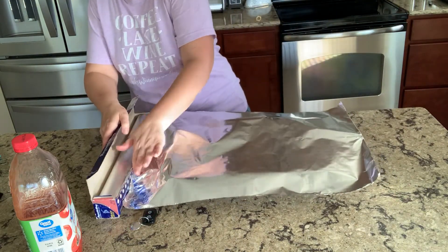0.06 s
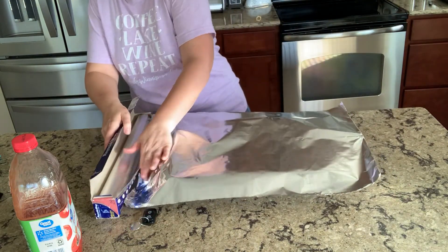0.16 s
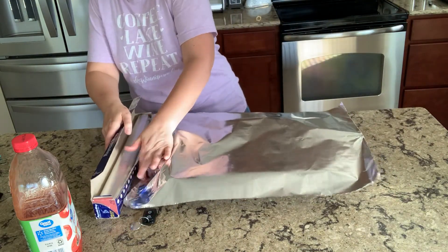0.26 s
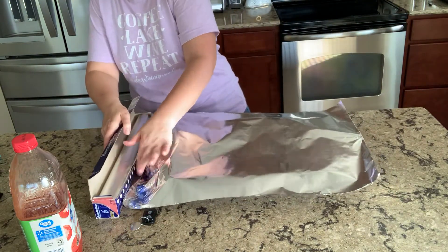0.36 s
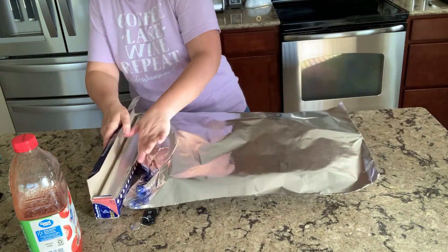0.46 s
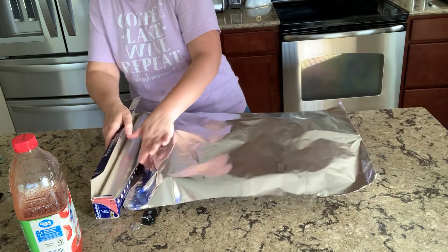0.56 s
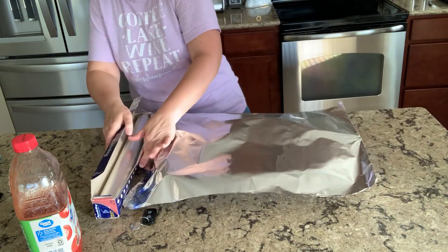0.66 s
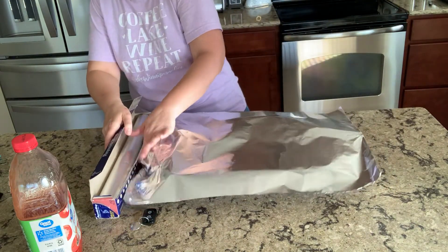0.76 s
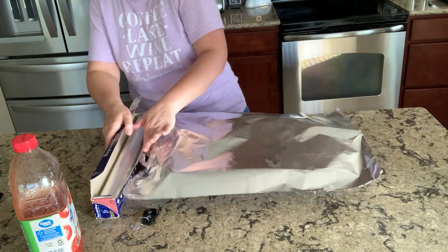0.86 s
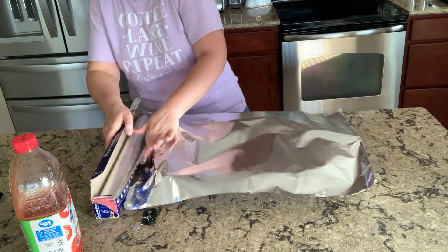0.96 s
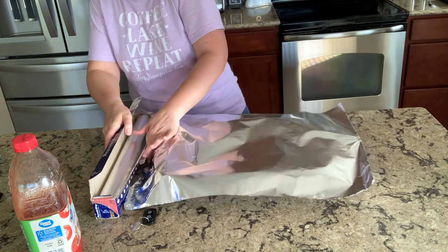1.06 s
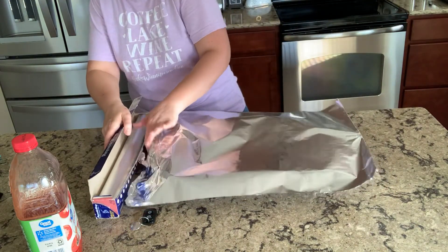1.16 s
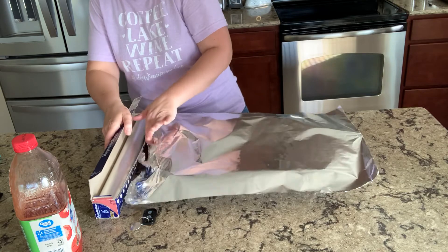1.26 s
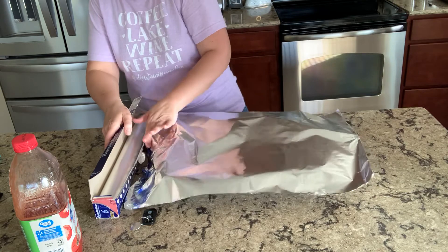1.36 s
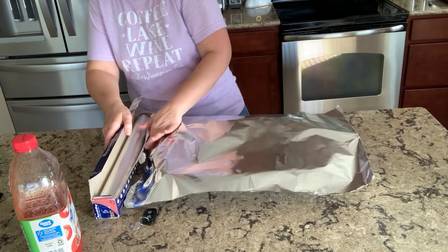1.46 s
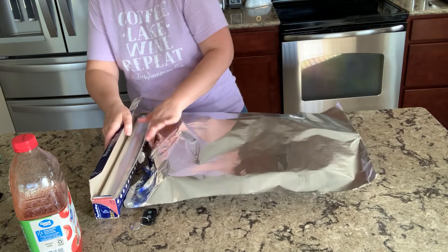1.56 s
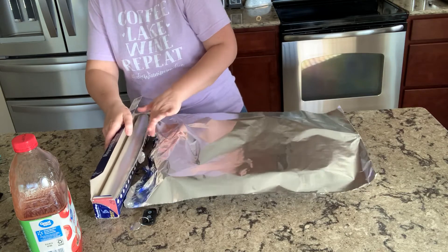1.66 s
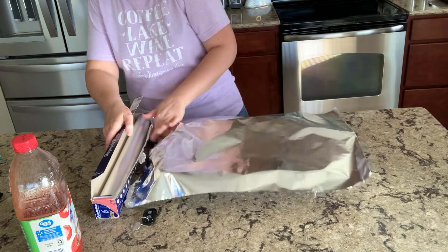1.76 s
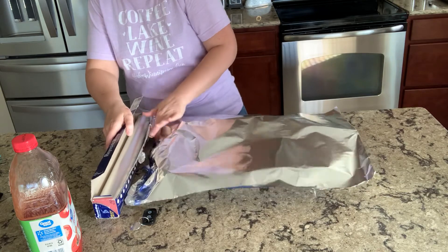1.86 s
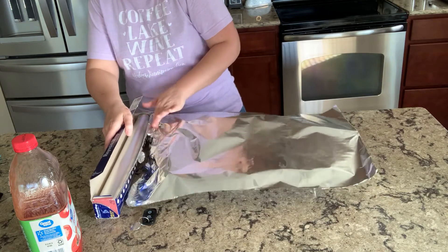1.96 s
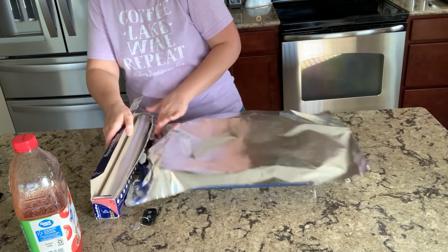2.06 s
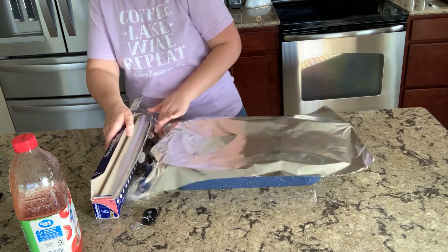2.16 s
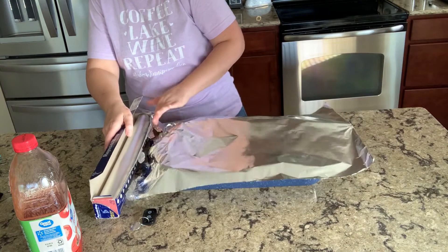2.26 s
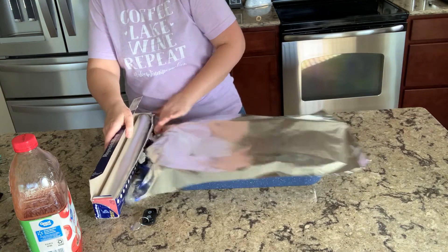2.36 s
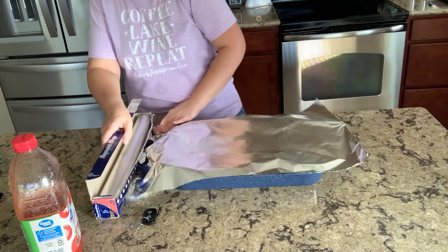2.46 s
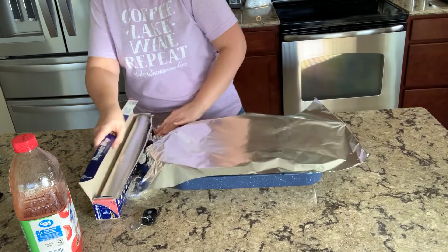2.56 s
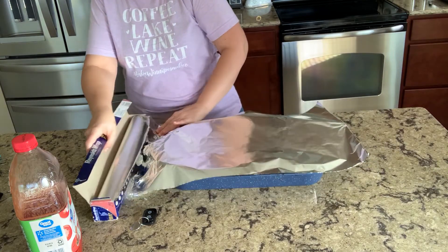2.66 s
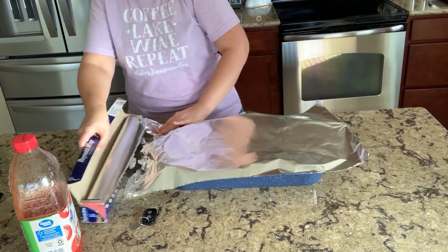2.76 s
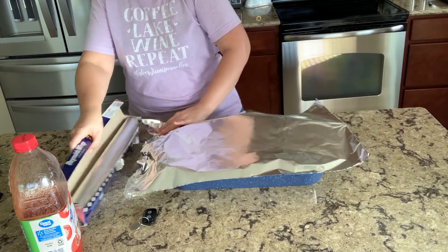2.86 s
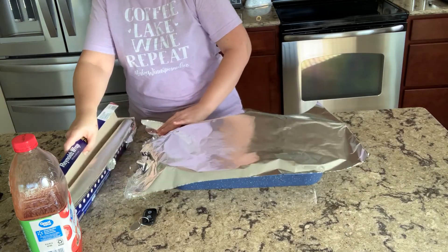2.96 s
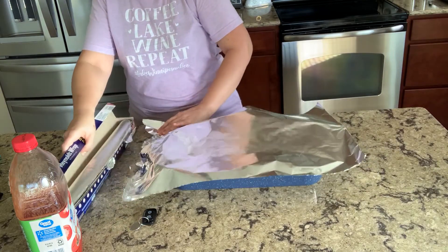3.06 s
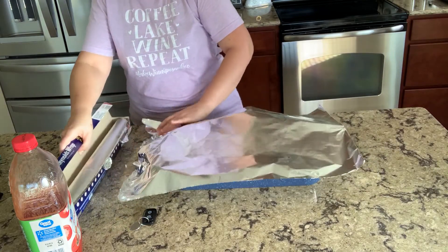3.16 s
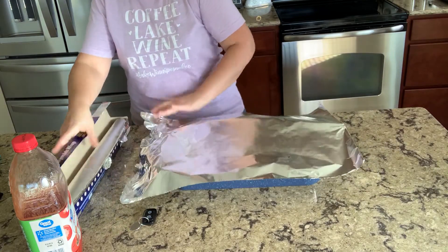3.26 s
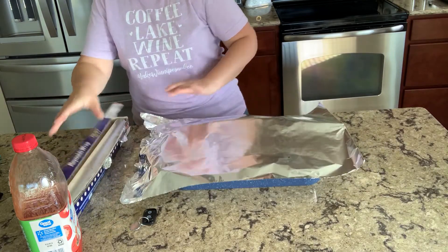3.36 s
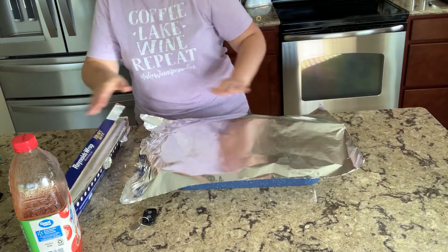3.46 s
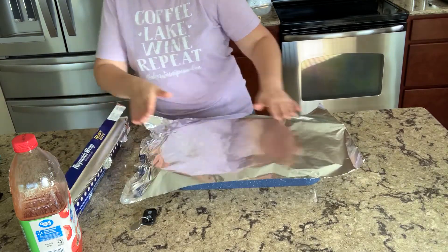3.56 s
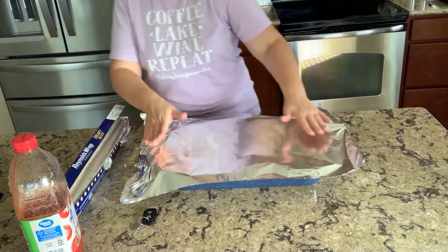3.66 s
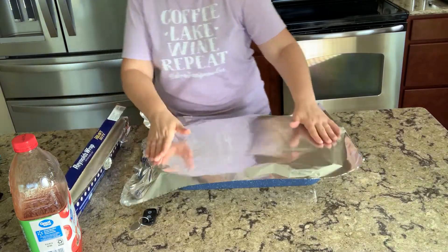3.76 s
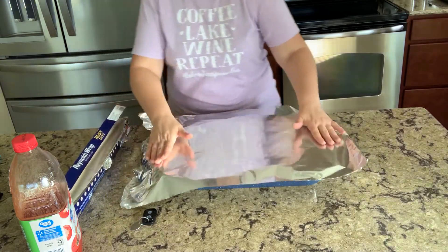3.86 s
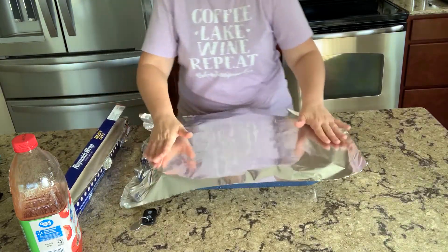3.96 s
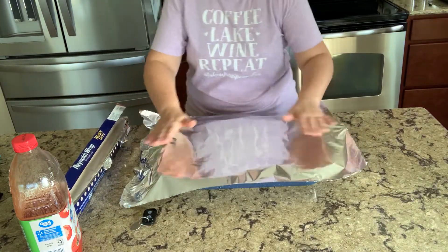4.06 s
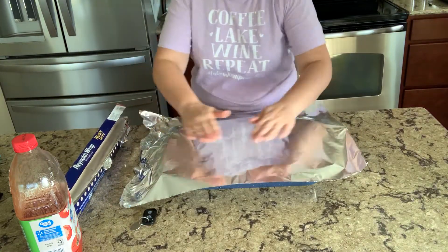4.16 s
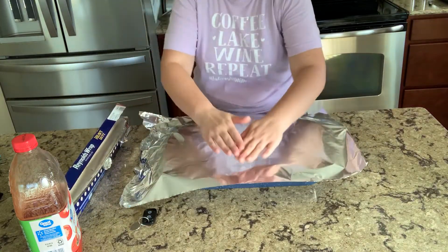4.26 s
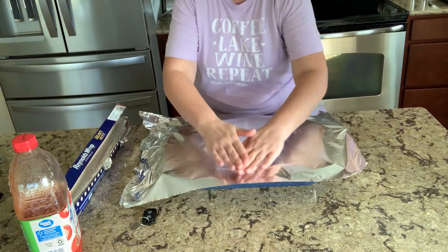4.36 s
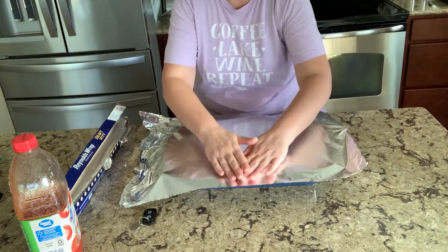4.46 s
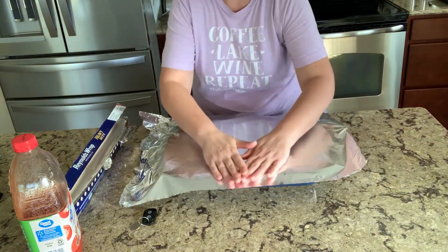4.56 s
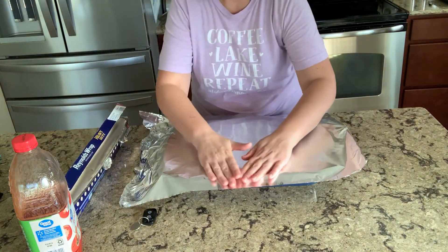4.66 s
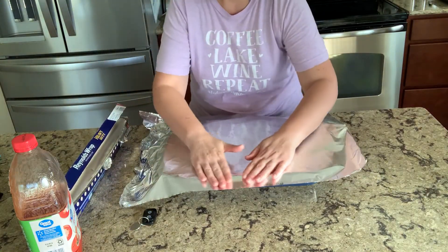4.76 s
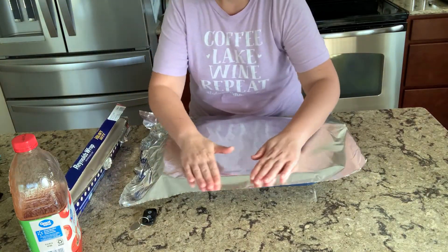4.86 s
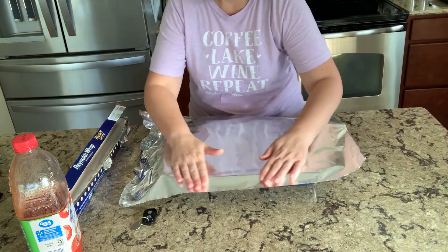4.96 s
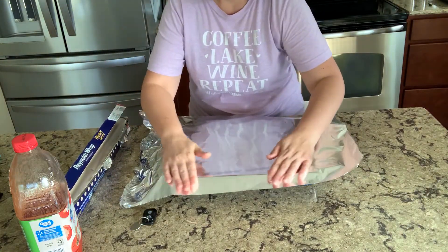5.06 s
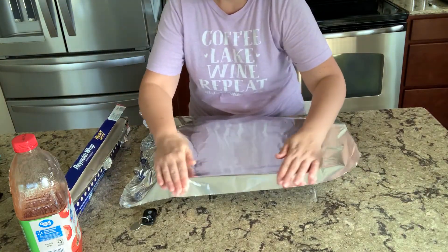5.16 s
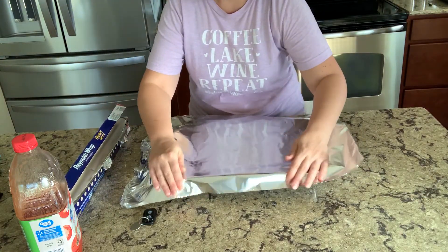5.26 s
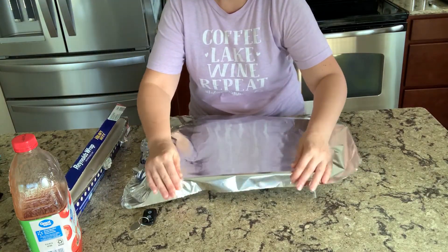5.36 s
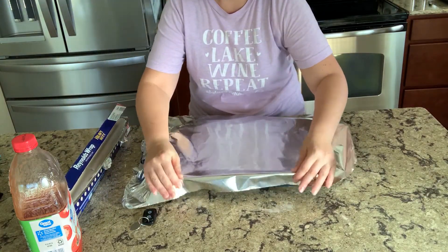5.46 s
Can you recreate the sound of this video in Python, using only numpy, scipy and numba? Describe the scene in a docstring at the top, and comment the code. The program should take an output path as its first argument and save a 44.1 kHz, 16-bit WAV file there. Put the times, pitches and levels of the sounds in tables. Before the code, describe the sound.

Aluminium foil rustles and crackles in repeated surges as a sheet is torn along its box, with sharp snaps from bigger creases. The cardboard box knocks lightly on a stone counter. After a brief lull, hands press the foil over a baking dish with softer crinkles and faint hollow taps. A phone picks it up in a hard, echoing kitchen over a low fridge hum.

```python
"""Aluminium foil rustles and crackles as a hand taps it and tears a sheet off along its box.
Then both hands press the sheet over a baking dish. Tiny creases snap by the thousand, big ones crack
one at a time, and flat patches of foil pop and ring. The card box knocks on the stone counter and
fingertips tap the covered dish. A hard kitchen echoes, a fridge hums, and a phone hears it all
through its two microphone openings (ports)."""
import sys
import numpy as np
from scipy import signal
from scipy.fft import rfft, irfft, next_fast_len
from scipy.io import wavfile
from scipy.ndimage import uniform_filter1d
from numba import njit

SR = 44100
rng = np.random.default_rng(int(sys.argv[2]) if len(sys.argv) > 2 else 0)


def master(y):
    """Save y as 16-bit WAV."""
    cut = np.clip(np.atleast_2d(y).T, -1, 1)
    pcm = np.round(cut * 32767)  # scale
    wavfile.write(sys.argv[1], SR, pcm.astype(np.int16))


N = 243873
T = np.arange(N) / SR
FFT_SIZE = next_fast_len(N + 8192, True)
LOG_HZ = np.log(np.maximum(np.fft.rfftfreq(FFT_SIZE, 1 / SR), 1))

# big creases giving way: (time [s], level [dB], pitch [Hz], bright edge against the body [dB])
BIG_CREASES = [(0.0759, -22, 3800, -6), (0.1446, -13, 2020, -11), (0.183, -14, 3860, -7),
               (0.2449, 3.5, 4230, -6.5), (0.552, -13, 2950, -6.5), (0.612, -12.5, 3460, -2),
               (0.6313, -4, 4500, -4), (1.166, -9, 2920, -12), (1.798, -4.5, 2340, -3.5),
               (2.132, 2, 3540, -5), (2.4203, -6, 2310, 4), (2.791, -9.5, 2860, -3), (2.883, -8.5, 2690, 2),
               (2.958, -10.5, 4990, -5.5), (3.2062, -22, 2660, 4), (3.8134, -15, 3730, 2),
               (3.822, -17, 4540, -2.5), (4.0282, -10, 4570, -4), (4.145, -16, 3590, -3.5),
               (4.516, -30, 6390, 4), (4.5345, -17, 4990, 4), (4.681, -17, 1500, -14),
               (4.8105, -16, 6050, 4), (4.877, -14, 3210, 1.5), (5.0154, -22, 3500, 0),
               (5.102, -17, 3550, -3.5), (5.1484, -24, 3790, -2), (5.22, -13.5, 3220, 1.5),
               (5.23, -10.5, 6200, -15), (5.241, -16, 6840, -17), (5.269, -22, 2430, -10),
               (5.3072, -10, 2670, -2.5), (5.3607, -17, 3560, 1), (5.452, -7, 6470, -4)]


def undb(db):
    """Turn decibels into a gain."""
    return 10 ** (np.asarray(db) / 20)


def unit(x):
    """Scale a signal to an average power of 1."""
    return x / np.sqrt(np.mean(x ** 2))


def sound(spectrum):
    """Turn a spectrum back into a wave."""
    return irfft(spectrum, FFT_SIZE)[..., :N]


def over_hz(table, log_hz=LOG_HZ):
    """Read a table of (frequency [Hz], value) between its rows."""
    hz, value = np.transpose(table)
    return np.interp(log_hz, np.log(hz), value)


def tone_filter(table):
    """A filter with the table's levels that never rings ahead of a click."""
    log_hz = np.log(np.fft.rfftfreq(8192, 1 / SR) + 1)
    cepstrum = irfft(np.log(undb(over_hz(table, log_hz))))
    cepstrum[1:4096] *= 2  # fold the late half onto the early half
    cepstrum[4097:] = 0
    return rfft(irfft(np.exp(rfft(cepstrum))), FFT_SIZE)


def wander(per_s):
    """A value that glides to a new random level per_s times a second."""
    step = int(SR / per_s)
    held = np.repeat(rng.standard_normal(N // step + 1), step)
    return unit(uniform_filter1d(held, step)[:N])


def ping(t, hz, ring_s):
    """A tone that fades by 60 dB in ring_s seconds."""
    return np.sin(2 * np.pi * hz * t) * 1000 ** (-t / ring_s)


def ports(spectrum):
    """One wave reaches the two ports out of step, more so at high pitch."""
    # how far the left port is ahead: (frequency [Hz], phase [rad])
    left_lead = [(100, 0), (600, -.4), (1400, -.2), (3400, -.9), (4500, -.5), (5500, -1.), (6000, 0),
                 (6550, 1.5), (7600, 2.5), (8900, 3.14), (10200, 3.8), (12200, 5.2), (13300, 6.2),
                 (15600, 6.5)]
    return spectrum * np.exp(np.outer([.5j, -.5j], over_hz(left_lead)))


def wide(make):
    """Left and right spectra of a spread-out source: partly shared, partly each port's own."""
    # sound common to both ports: (frequency [Hz], share before the cap [0 to 1])
    common = [(60, 0.62), (300, 0.69), (700, 0.27), (1400, .45), (3500, 0.2), (6000, 0.13), (8000, 0.96),
              (15000, 1)]
    alike = np.clip(over_hz(common), 0, .86)
    shared, *own = rfft(np.array([make() for _ in range(3)]), FFT_SIZE)
    return ports(shared * np.sqrt(alike)) + np.array(own) * np.sqrt(1 - alike)


def wide_layer(make, tone):
    """A spread-out source, filtered to the given tone, at power 1."""
    return unit(sound(wide(make) * tone_filter(tone)))


def fridge():
    """Wavering motor tones over a low room rumble with a faint, even high hiss."""
    # motor tones: (pitch [Hz], level [dB])
    motor = [(53.8, -53.5), (118.4, -50), (183.0, -54.5)]
    # low rumble and faint hiss: (frequency [Hz], relative level [dB])
    noise_tone = [(18, -29.5), (30, -12.5), (71, -1.5), (119, -7), (190, 0), (240, -10.5), (374, -7),
                  (629, -25), (1870, -26), (2370, -53), (5440, -30), (7240, -55), (15000, -57)]
    hum = sum(undb(db + 2.5 * wander(14)) * np.sin(2 * np.pi * hz * T + .92 * wander(14))
              for hz, db in motor)
    return hum + undb(-44) * wide_layer(lambda: rng.standard_normal(N), noise_tone)


def kitchen(x):
    """The echo of a source that never stays put: the power of each octave lingers as noise."""
    # length of the echo: (frequency [Hz], time to fade 60 dB [s])
    echo_times = [(250, 0.98), (1000, 0.48), (4000, 0.72), (8000, 0.23), (15000, 0.069)]
    source, out = rfft(x, FFT_SIZE), 0
    noise = wide(lambda: rng.standard_normal(N))
    for hz in 700 * 2. ** np.arange(5):
        octave = np.cos(np.pi / 2 * np.clip((LOG_HZ - np.log(hz)) / np.log(2), -1, 1))
        keep = 1e-6 ** (1 / (over_hz(echo_times, np.log(hz)) * SR))
        power = signal.lfilter([1 - keep], [1, -keep], sound(source * octave) ** 2)
        loudness = np.sqrt(uniform_filter1d(power, size=301, origin=150) + 1e-18)
        out = out + loudness * unit(sound(noise * octave))
    return out


def tick(at_s=3.6433):
    """One small metallic tick in the pause, gone almost at once."""
    # tones of the tick: (pitch [Hz], level [dB])
    tones = [(1600, -33), (3500, -23), (4400, -29), (5400, -24), (10500, -38), (13500, -37)]
    t = np.maximum(T - at_s, 0)
    return sum(undb(db) * ping(t, hz, ring_s=.007) for hz, db in tones)


def taps():
    """A soft fingertip sets the air under the foil ringing for a moment."""
    # taps on the covered dish: (time [s], level [dB], pitch [Hz])
    touches = [(3.825, -24, 1160), (4.538, -21.5, 1230), (4.679, -22, 976), (5.22, -21, 1400)]
    out, t = np.zeros(N), T[:5000]
    rise = 1 - np.exp(-t / .003)
    for s, db, hz in touches:
        i = int(s * SR)
        out[i:i + len(t)] += undb(db) * ping(t, hz, ring_s=.083) * rise
    return out


def box():
    """The card box raps on the counter; a soft thud of box and roll swells behind."""
    # the box's own tones: (pitch [Hz], relative level [dB], time to fade 60 dB [s])
    tones = [(625, -10, .04), (1495, 0.5, 0.026), (2540, -14, 0.018), (3730, -18, 0.016)]
    # the box is set down: (time [s], rap gain [dB], thud gain [dB])
    knocks = [(2.7924, -26, -50), (2.8842, -13, -42), (2.9592, -13, -17.5)]
    out, t = np.zeros(N), T[:9000]
    rap = sum(undb(db) * ping(t, hz, ring_s) for hz, db, ring_s in tones)
    thud = ping(t, hz=276, ring_s=.14) * (1 - np.exp(-t / .0066))
    for s, rap_db, thud_db in knocks:
        i = int(s * SR)
        out[i:i + len(t)] += undb(rap_db) * rap + undb(thud_db) * thud
    return out


@njit
def ring(out, start, length, pole, size):
    """Add one fading tone per pop; its pole turns and shrinks it a little every sample."""
    for k in range(len(start)):
        z = size[k] + 0j
        for i in range(start[k], min(start[k] + length[k], len(out))):
            z *= pole[k]
            out[i] += z.imag
    return out


def patches(per_s, lo_hz, hi_hz, cycles, spread_db):
    """Flat patches of foil pop and ring briefly, each at its own pitch."""
    when, pitch, size = rng.random((int(per_s * N / SR), 3)).T
    hz = lo_hz + (hi_hz - lo_hz) * pitch
    pole = np.exp(hz / SR * (2j * np.pi - 1 / cycles))
    gain = undb(-spread_db * np.log(size + 1e-9)) * np.sqrt(hz / hi_hz)  # equal energy at every pitch
    start, length = (when * N).astype(np.int64), (4 * cycles * SR / hz).astype(np.int64)
    return ring(np.zeros(N), start, length, pole, gain)


def clicks(per_s, spread_db, bunch_db, bunch_per_s, tail_s):
    """Foil buckles at random, in louder and softer bunches; each click rattles on briefly."""
    hit, size = rng.random(N) < per_s / SR, rng.exponential(size=N)
    train = hit * undb(spread_db * size + bunch_db * wander(bunch_per_s))
    rattle = signal.lfilter([1], [1, -np.exp(-1 / (tail_s * SR))], train ** 2)
    return np.sqrt(rattle) * rng.standard_normal(N)


def sheet(rustle_db, hollow_db, wobble_db):
    """The loose sheet flexes all over, duller as it settles; larger panels pop lower and less often."""
    # rustle of small patches: (frequency [Hz], relative level [dB])
    rustle_tone = [(900, -27.5), (1800, -6.5), (2400, -2.5), (3100, -3), (3800, -1), (4600, -3.5),
                   (6000, -5.5), (8000, -5.5), (11000, -30), (15000, -44.5)]
    # hollow sound of larger panels: (frequency [Hz], relative level [dB])
    hollow_tone = [(450, -27), (900, -2.5), (1250, -1.5), (1600, -2.5), (2300, -8.5), (4000, -36)]
    # low wobble of the sheet: (frequency [Hz], relative level [dB])
    wobble_tone = [(120, -21.5), (270, -2.5), (420, -7.5), (650, 0), (900, -3), (1800, -44)]
    rustle = wide_layer(lambda: patches(4000, 1202, 13000, cycles=41, spread_db=1.7), rustle_tone)
    hollow = wide_layer(lambda: patches(900, 500.5, 3475, cycles=13.8, spread_db=1.2), hollow_tone)
    wobble = wide_layer(lambda: clicks(590, 2.5, 2, bunch_per_s=15, tail_s=.006), wobble_tone)
    dull = signal.sosfilt(signal.butter(2, 4500, fs=SR, output="sos"), rustle)
    bright_share = undb(.63 * np.minimum(rustle_db + 27, 0))
    rustle = bright_share * rustle + (1 - bright_share) * dull
    return undb(rustle_db) * rustle + undb(hollow_db) * hollow + undb(wobble_db) * wobble


def crackle(db):
    """Tiny creases under the fingers: dense bright ticks, and flurries that start sharply and fade."""
    # tone of tiny creases: (frequency [Hz], relative level [dB])
    tone = [(800, -25.5), (2000, -12), (4000, -5.5), (6500, -9), (9000, 8), (11000, 4.5), (13000, -7),
            (15600, -26)]
    ticks = unit(clicks(2500, spread_db=2.2, bunch_db=1.5, bunch_per_s=40, tail_s=.0012))
    flurries = unit(clicks(45, spread_db=2.2, bunch_db=.96, bunch_per_s=7.7, tail_s=.0071))
    spectrum = rfft(ticks + undb(-2.5) * flurries, FFT_SIZE)
    return undb(db) * unit(sound(spectrum * tone_filter(tone)))


def snaps(length=2000, fade_s=.022, rise_s=.0021):
    """Each big crease gives way in a burst of noise: a body around its pitch and a thin bright edge."""
    out, t = np.zeros((2, N + length)), T[:length]
    fade = 1000 ** (-t / fade_s) * (1 - np.exp(-t / rise_s))
    for s, db, hz, edge_db in BIG_CREASES:
        noise = rng.standard_normal(length)
        band = signal.butter(2, [hz / 2.3, hz * 2], "bandpass", fs=SR, output="sos")
        body = unit(signal.sosfilt(band, noise))
        edge = undb(edge_db) * unit(np.diff(noise, n=2, prepend=[0, 0]))
        i = int(s * SR)
        out[:, i:i + length] += undb(db) * np.array([body, edge]) * fade
    return out[:, :N]


def hands():
    """Levels in dB of four layers (rustle, crackle, hollow, wobble): sway, strokes and snaps add up."""
    # how hard the loose sheet sways between strokes: (time [s], level [dB])
    sway_levels = [(0, -28.5), (.07, -35), (.2, -22.5), (.34, -23), (.44, -22.5), (.53, -32), (.6, -30),
                   (.76, -24.5), (.95, -21), (1.12, -22.5), (1.23, -18.5), (1.35, -25.5), (1.76, -35.5),
                   (2.03, -20), (2.09, -22.5), (2.39, -23.5), (2.55, -24), (2.66, -22), (2.78, -28),
                   (2.85, -23), (2.875, -26.5), (2.97, -23.5), (3.08, -28.5), (3.36, -24), (3.57, -37.5),
                   (3.79, -53.5), (4.03, -27.5), (4.17, -29.5), (4.3, -37), (4.5, -51.5), (4.66, -32),
                   (4.73, -27), (5.03, -31), (5.18, -37), (5.24, -26.5), (5.27, -30.5), (5.53, -21)]
    # a hand tugs or presses: (peak time [s], base rise time per 20 dB [s], base hold [s],
    # base fall [dB/s], delay of hollow and wobble [s], rustle [dB], crackle [dB], hollow [dB],
    # wobble [dB]); each layer scales the base values in its own way
    strokes = [(.16, .03, .02, 150, -.004, -30, -36, -30, -32),
               (0.251, .025, 0.0017, 160, .003, -10.5, -17, -18, -24),
               (0.653, .065, .03, 164, -.006, -11.5, -9.5, -22.5, -28),
               (1.01, .11, .025, 78, .004, -13.5, -11.5, -19, -29.5),
               (1.45, .16, .022, 68, .006, -13, -13.5, -19.5, -28),
               (1.817, 0.08, .012, 60, -.008, -13.5, -13.5, -26, -31.5),
               (2.14, 0.09, 0.0036, 120, -.003, -12, -5.5, -20, -27),
               (2.441, 0.08, .012, 186, .006, -10.5, -6, -19.5, -26),
               (2.895, .03, 0.0036, 120, .004, -22, -22, -26, -28.5),
               (3.824, .022, 0.026, 60, -.002, -20.5, -17.5, -27, -37),
               (3.93, 0.01, .02, 90, .002, -23, -24, -36, -46),
               (4.545, .035, .045, 110, -.004, -24, -23, -30.5, -40.5),
               (4.69, .02, 0.0037, 150, -.004, -32, -36, -30, -29),
               (4.945, .04, .03, 150, .002, -31, -29, -40, -48),
               (5.07, .05, .07, 150, .005, -30, -35, -32, -39),
               (5.225, .015, .01, 170, .003, -30, -29, -31, -35),
               (5.512, 0.12, .03, 90, .01, -23, -18.5, -37, -49)]
    usual_db, settled_db, covered_s = -22, -30, 4.5
    at_usual_db, sway_slope = np.array([-22, -26, -31.5, -38]), [1.028, 2.4, .84, .71]
    stroke_slope, hold_share = [1.01, 1.8, 1.4, 1.4], [1.01, 1.01, .4, .4]  # low panels let go sooner
    sway = np.interp(T, *np.transpose(sway_levels))
    settling_db = np.minimum(sway - settled_db, 0)
    db = at_usual_db[:, None] + np.outer(sway_slope, sway - usual_db)
    db[1] += 2.2 * settling_db  # creases fall silent faster in a settled sheet
    db[2] += 3.5 * (T > covered_s)  # the dish under the sheet makes it more hollow
    power = undb(2 * db)
    for s, rise, hold, fall, late, *peak_db in strokes:
        for k, delay in enumerate([0, 0, late, late]):
            t = T[::64] - s - delay
            shape_db = np.minimum(20 * t / rise, 0) - fall * np.maximum(t - hold_share[k] * hold, 0)
            power[k] += np.interp(T, T[::64], undb(2 * (peak_db[k] + stroke_slope[k] * shape_db)))
    # each big snap sets off more crackle, less in a settled sheet
    rise_s, fall_db_per_s = .008, 420
    for s, snap_db, _, edge_db in BIG_CREASES:
        i = int(s * SR)
        start_db = snap_db + edge_db - 7 + .6 * settling_db[i]
        t = T[:min(9000, N - i)]
        power[1, i:i + len(t)] += undb(2 * (start_db - fall_db_per_s * t)) * (1 - np.exp(-t / rise_s))
    return 10 * np.log10(power)


def scene():
    """Foil, box and fingertips in the echoing kitchen, over the fridge."""
    rustle_db, crackle_db, hollow_db, wobble_db = hands()
    creases = crackle(crackle_db)
    bodies, edges = snaps()
    hits = bodies + box() + taps()
    direct = sound(ports(rfft(creases + hits + edges + tick(), FFT_SIZE)))
    echo = kitchen(undb(-4.5) * creases + undb(-6) * hits + undb(-18) * edges)
    return direct + echo + sheet(rustle_db, hollow_db, wobble_db) + fridge()


def record(dry):
    """The right port is a little more sensitive; the bass is cut, peaks clip and the top is cut."""
    bass_cut = signal.butter(2, 45, "high", fs=SR, output="sos")
    top_cut = signal.ellip(10, .2, 70, 15650, fs=SR, output="sos")
    heard = signal.sosfilt(bass_cut, dry * undb([[0], [.5]]))
    return signal.sosfilt(top_cut, np.clip(heard, -1, 1))


dry = scene()
out = record(dry)
master(out)
```